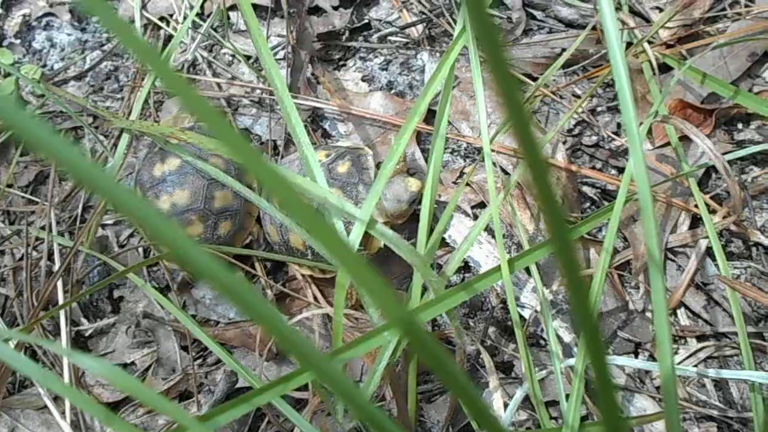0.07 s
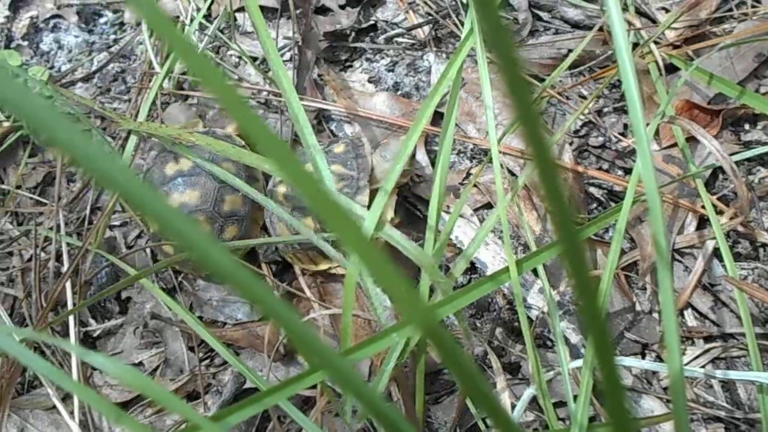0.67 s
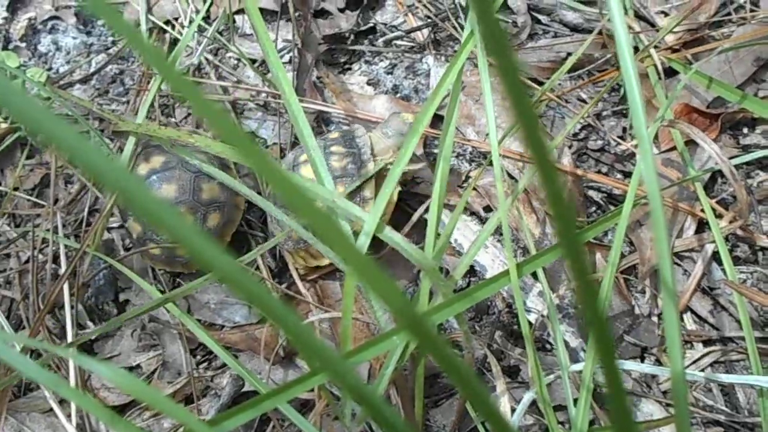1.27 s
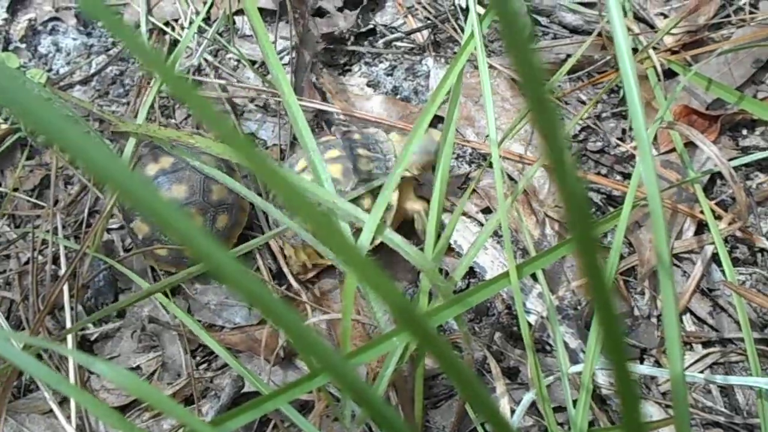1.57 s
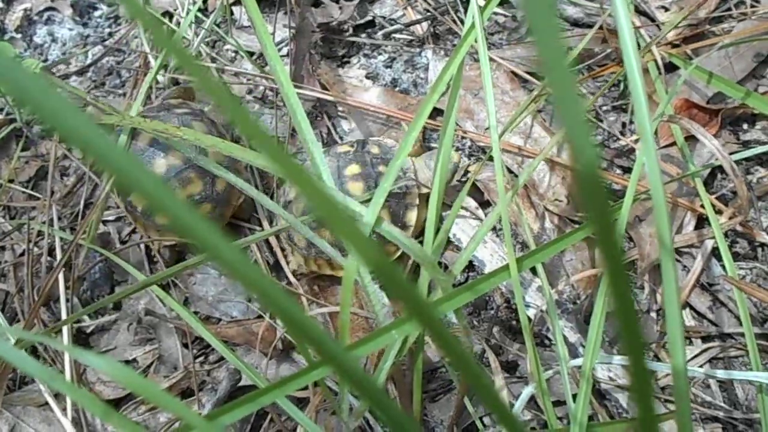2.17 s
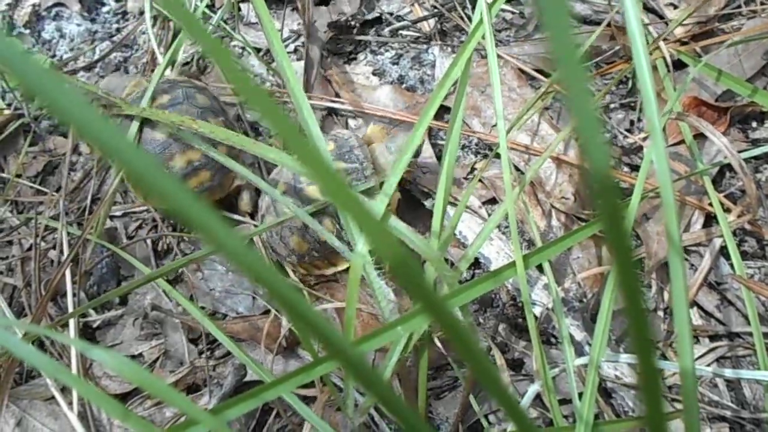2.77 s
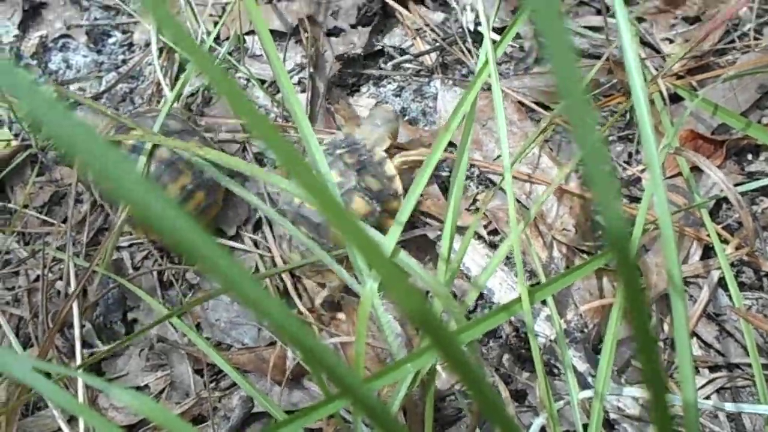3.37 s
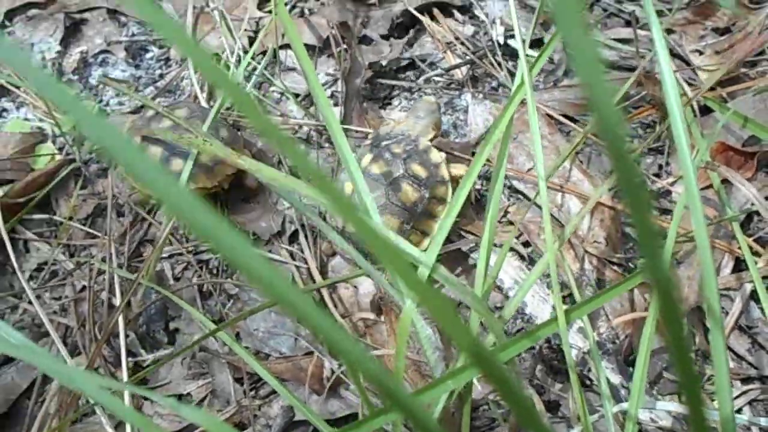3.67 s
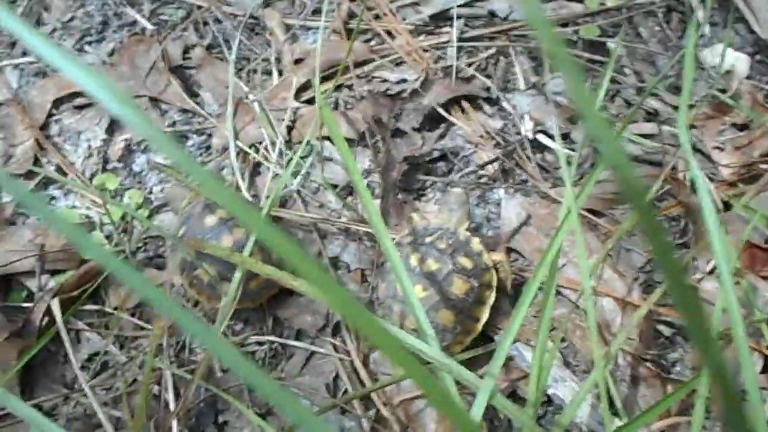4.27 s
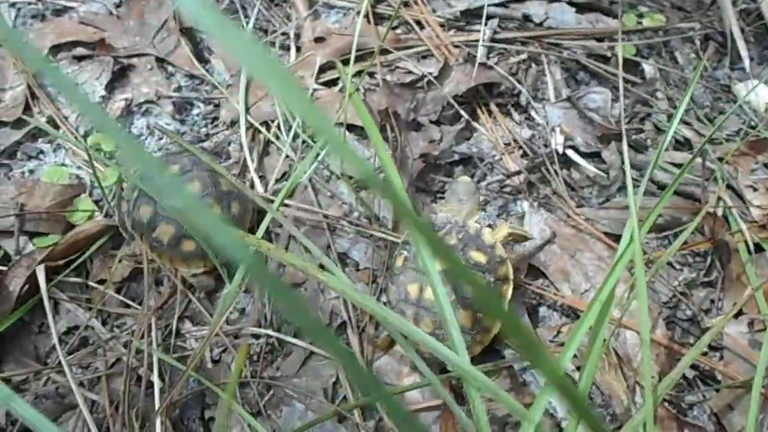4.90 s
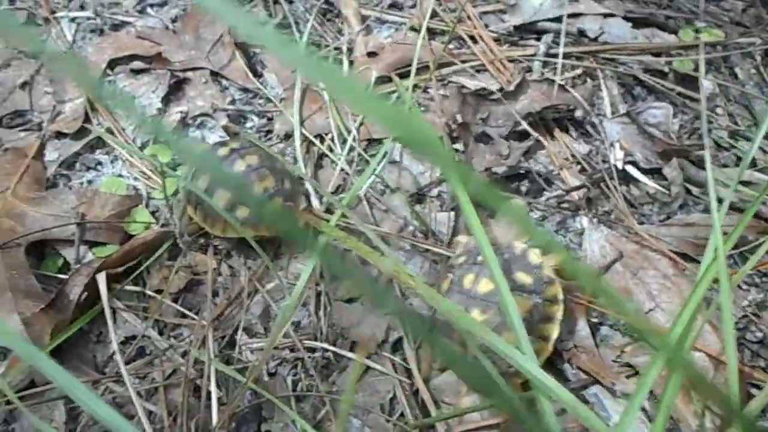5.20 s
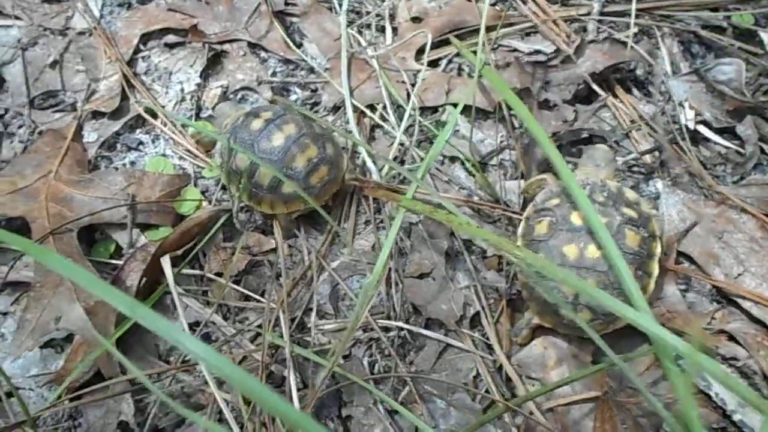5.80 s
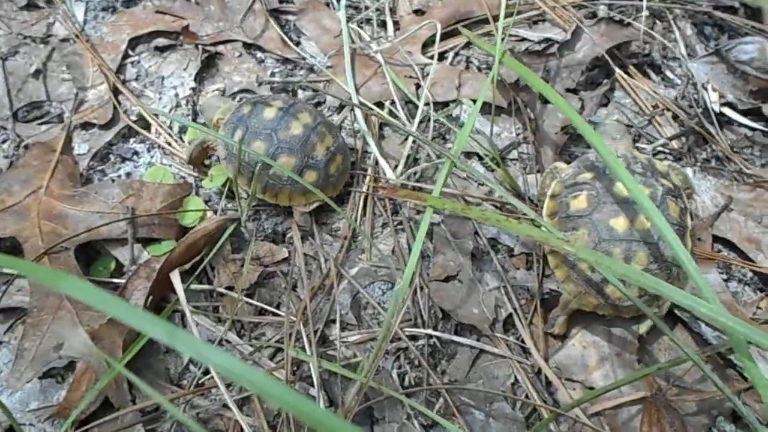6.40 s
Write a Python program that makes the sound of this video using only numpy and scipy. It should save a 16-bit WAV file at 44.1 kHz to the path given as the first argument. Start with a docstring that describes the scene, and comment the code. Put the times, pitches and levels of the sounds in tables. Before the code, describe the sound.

The sound fades in over the first half second on open air: a low wind rumble, a far engine-like drone and a faint hiss, all of which stay throughout. Close to the microphone, two small tortoises push through dry leaf litter and grass. Light rustles and crisp snaps come from about 0.3 to 0.7 seconds, followed by a lull with a few ticks. Around 1.5 to 1.9 seconds there are more crackles, a small knock and faint shell scrapes. The busiest stretch runs from 2.4 to 4 seconds, with uneven rustling and the sharpest snaps and dull twig knocks near 2.5 and 3.3 seconds. Short bursts follow around 4.3 to 4.7 and 5 to 5.4 seconds. Near 6 seconds come more crackles, soft scrapes and little knocks, with a last knock at 6.4 seconds as the rustling settles.

```python
"""Two small tortoises push through dry leaf litter and long grass, close to the microphone.
Each push of a foot or shell breaks tiny fibres that ring the leaves: they rustle, crackle and snap.
A shell scrapes over the litter, and there are a few dull knocks among the twigs.
Behind them, in the open air, lie a low rumble, a far engine-like drone and a faint hiss.
The microphone fades in at the start."""
import sys
import numpy as np
from scipy import signal
from scipy.fft import rfft, irfft
from scipy.io import wavfile
from scipy.ndimage import uniform_filter1d

SR = 44100
rng = np.random.default_rng(int(sys.argv[2]) if len(sys.argv) > 2 else 0)


def master(y):
    """Save y as 16-bit WAV."""
    cut = np.clip(np.atleast_2d(y).T, -1, 1)
    pcm = np.round(cut * 32767)  # scale
    wavfile.write(sys.argv[1], SR, pcm.astype(np.int16))


N = 293265

# spectrum of the open air: f/Hz, relative level/dB
AIR_SPECTRUM = [(20, 2), (35, 0.5), (60, 0), (100, -0.5), (150, -7.5), (220, -7.5), (300, -12), (400, -19),
                (510, -16), (900, -19.5), (1400, -28.5), (2400, -34.5), (4000, -35), (10500, -42.5)]
# bands of the far drone: f/Hz, width/Hz, level before the swell/dB
DRONE_BANDS = [(80.1, 9, -43.5), (88.1, 6.8, -49), (113, 6.7, -47.5), (134.1, 6.4, -51.5),
               (158.2, 4.9, -53), (185, 6.3, -53)]
# the drone swells and sinks: t/s, gain/dB
DRONE_SWELL = [(0.07, 9), (1.1, 2.5), (2.2, -1.5), (3.2, 1), (4.3, -3.5), (5.3, -2.5), (6.0, 0),
               (6.65, -1.5)]
# knocks and ticks, like shell or claw on a twig: t/s, f/Hz, time to fall 60 dB/s, strength/dB
KNOCKS = [(0.7358, 3980, .018, -32), (1.2386, 3520, 0.045, -42), (1.5582, 1520, .012, -34.5),
          (1.5566, 3480, 0.018, -35), (2.51, 1980, 0.0072, -29.5), (3.3157, 940, 0.012, -30),
          (3.3173, 1220, .012, -35.5), (3.333, 1750, 0.015, -25.5), (4.7116, 2380, 0.0091, -31.5),
          (4.713, 1540, 0.01, -32), (6.004, 1227, .012, -35), (6.005, 1570, 0.02, -33.5),
          (6.117, 1480, 0.011, -34), (6.155, 1550, 0.014, -39.5), (6.432, 1350, 0.015, -33),
          (6.437, 1880, 0.036, -32.5)]
# a shell drags over the litter: middle t/s, half length/s, f/Hz, level at the middle/dB
SCRAPES = [(1.76, 0.016, 1404, -53), (1.847, 0.022, 2080, -50.5), (4.367, 0.016, 1890, -49.5),
           (5.101, .012, 3226, -55), (5.181, .008, 3120, -50), (5.932, 0.018, 2870, -58),
           (6.04, 0.008, 2920, -46.5), (6.175, 0.054, 3000, -58.5)]
# a foot or shell pushes into the litter: t/s, length/s, effort/dB
PUSHES = [(0.326, 0.078, -60), (0.487, 0.11, -55), (0.625, 0.044, -54), (1.532, 0.031, -47.5),
          (1.658, 0.042, -47.5), (1.747, 0.041, -52), (1.964, .03, -65), (2.2, 0.018, -55.5),
          (2.428, 0.12, -46), (2.499, 0.038, -42), (2.558, 0.14, -55.5), (2.798, .04, -53.5),
          (2.984, 0.031, -47), (3.05, 0.14, -49), (3.227, 0.073, -50), (3.338, .075, -53),
          (3.448, 0.12, -54.5), (3.617, 0.17, -49.5), (3.8, 0.25, -55), (3.999, 0.026, -45),
          (4.296, 0.032, -49.5), (4.356, 0.019, -46.5), (4.514, 0.029, -46.5), (4.569, 0.059, -47),
          (4.709, 0.044, -54), (4.969, 0.16, -59.5), (5.052, 0.13, -49), (5.309, 0.13, -54),
          (5.692, 0.035, -58), (5.883, 0.064, -50.5), (5.996, .055, -47.5), (6.167, 0.037, -47.5)]
# small movements between the pushes: t/s, effort/dB
SHUFFLE = [(.1, -54.5), (1.4, -67.5), (2.3, -60), (3.5, -57), (4.2, -61), (5.5, -61.5), (6.2, -62),
           (6.6, -66.5)]
# resonances of a middling dry leaf: lower edge f/Hz, peak f/Hz, upper edge f/Hz, peak width/Hz
LEAF_MODES = [(1270, 1900, 2770, 740), (2930, 3740, 4600, 630), (5340, 6370, 9200, 340),
              (9430, 9560, 15000, 2100)]
# colour of the small crackles in such a leaf: f/Hz, gain/dB
CRACKLE_COLOUR = [(1400, -3.5), (1950, -3.5), (2700, -4), (3250, 4), (3720, 6), (4200, 4), (5000, -2.5),
                  (5800, 4.5), (6600, 5.5), (7700, 3), (9100, 6.5), (10500, 5.5)]
# the leaves underfoot change along the way, larger ones ringing lower: t/s, pitch factor
LEAF_PITCH = [(0.3, 0.97), (1.2, 1.17), (2.0, 0.94), (2.5, 1.01), (3.1, 1.04), (3.35, 0.96), (3.8, 1.09),
              (4.05, 0.97), (4.35, 0.9), (5.1, 0.89), (5.4, 0.82), (5.9, 0.83), (6.6, 0.88)]
# leaves and stalks snap: t/s, crack length/s, strength over 5 ms/dB, favoured f/Hz
SNAPS = [(.3419, 0.00046, -35, 10000), (.3515, 0.0011, -43, 9000), (.3927, .001, -46, 8900),
         (.514, .0004, -42, 8040), (.622, 0.0011, -41.5, 6000), (.7359, 0.00046, -38, 4700),
         (0.9847, 0.0013, -47.5, 4200), (1.54, 0.00037, -46, 3870), (1.5508, .0016, -36, 3840),
         (1.5582, 0.00099, -35.5, 2460), (1.9641, .002, -43.5, 5400), (1.987, .0004, -43.5, 4800),
         (2.1128, 0.0014, -44, 3500), (2.2724, 0.0058, -47, 4200), (2.3797, 0.0014, -42.5, 5140),
         (2.4614, 0.00054, -35.5, 5760), (2.5, .0007, -39, 9800), (2.5109, 0.00016, -25.5, 6050),
         (2.5298, 0.00043, -43, 6400), (2.54, .0014, -42, 6600), (2.5464, 0.0014, -41.5, 5400),
         (2.7558, .0007, -41, 7600), (2.8082, 0.00048, -39.5, 9200), (2.82, .0004, -42.5, 7800),
         (2.8993, 0.00082, -43.5, 7100), (3.0074, 0.0013, -39, 5800), (3.053, 0.0013, -40, 6600),
         (3.062, 0.00033, -37, 8200), (3.067, 0.0019, -34.5, 8000), (3.237, 0.0014, -42.5, 4700),
         (3.2832, 0.0016, -39.5, 6600), (3.2919, 0.0011, -35.5, 4600), (3.3325, 0.00047, -26.5, 5860),
         (3.3377, .0013, -36.5, 6200), (3.3893, 0.0015, -29.5, 4460), (3.6376, 0.0012, -37.5, 7000),
         (3.761, .0018, -37, 9650), (3.892, 0.00068, -34, 8400), (4.0093, 0.00091, -39.5, 4010),
         (4.018, 0.0013, -41, 3390), (4.2147, 0.0021, -44, 4300), (4.53, 0.0024, -38, 9630),
         (4.5928, 0.00064, -42, 5200), (4.615, 0.0016, -37, 7800), (4.618, 0.00082, -32.5, 5760),
         (4.762, 0.0023, -46, 4230), (5.1163, 0.00041, -40, 3940), (5.3666, 0.0013, -42, 5200),
         (5.6934, 0.00036, -44, 5000), (5.8256, 0.0016, -42, 10000), (5.8705, 0.00086, -41.5, 3500),
         (6.0107, 0.0011, -41, 3330), (6.1041, 0.0015, -37, 8000)]
# the microphone fades in: t/s, gain/dB
FADE_IN = [(0, -96), (.0715, -94), (.073, -15.5), (.16, -17.5), (.25, -9), (.4, -4.5), (.55, -1.5),
           (1.5, 0.5), (6.65, 1)]

CRISP_DB_PER_OCTAVE = 5   # smaller, higher leaves are also crisper


def from_db(db):
    return 10 ** (np.asarray(db) / 20)


def unit_rms(x):
    return x / np.sqrt(np.mean(x ** 2) + 1e-20)


def in_time(rows):
    """A table of time and value, read at every sample."""
    return np.interp(np.arange(N) / SR, *np.transpose(rows))


def at_hz(points, hz):
    """A spectrum read on a log-frequency axis."""
    freqs, levels = np.transpose(points)
    return np.interp(np.log(hz), np.log(freqs), levels)


def butter(x, hz, kind, order=2):
    return signal.sosfilt(signal.butter(order, hz, kind, fs=SR, output="sos"), x)


def resonance(x, hz, width_hz):
    """Two-pole resonance with gain 1 at its peak."""
    r = np.exp(-np.pi * width_hz / SR)
    feedback = [1, -2 * r * np.cos(2 * np.pi * hz / SR), r * r]
    return signal.lfilter(np.array([1, 0, -1]) * (1 - r * r) / 2, feedback, x + 1e-18)


def drift(rate_hz):
    """A smooth random wander with rms 1."""
    r = np.exp(-2 * np.pi * rate_hz / SR)
    return unit_rms(signal.lfilter([1], [1, -2 * r, r * r], rng.standard_normal(N + SR))[SR:])


def open_air(level_db=-38, swell_db=0.5):
    """All around: low wind and far-off rumble under a faint hiss."""
    hz = np.maximum(np.arange(N // 2 + 1) * SR / N, 1)
    air = irfft(rfft(rng.standard_normal(N)) * from_db(at_hz(AIR_SPECTRUM, hz)), N)
    return from_db(level_db + swell_db * drift(rate_hz=3)) * unit_rms(butter(air, 17.8, "high"))


def far_drone():
    """In the distance: an engine-like drone of narrow, wavering bands of noise."""
    drone = np.zeros(N)
    for hz, width, db in DRONE_BANDS:
        band = resonance(rng.standard_normal(N + SR), hz, 2 * width)
        drone += from_db(db) * unit_rms(resonance(band, hz, 2 * width)[SR:])
    return from_db(in_time(DRONE_SWELL)) * drone


def twig_knocks(scuff_db=-5, scuff_s=0.0047):
    """On the ground nearby: a soft, scuffing contact sets a twig ringing briefly."""
    size = 4096
    t, out = np.arange(size) / SR, np.zeros(N + size)
    for start, hz, t60, db in KNOCKS:
        ring = np.sin(2 * np.pi * hz * t) * from_db(-60 * t / t60)
        scuff = unit_rms(resonance(rng.standard_normal(size), hz, hz / 2)) * np.exp(-t / scuff_s)
        at = round(start * SR)
        out[at:at + size] += from_db(db) * butter(ring + from_db(scuff_db) * scuff, 1.1 * hz, "low")
    return out[:N]


def shell_scrapes(slips_per_s=700, spread_db=5, ring_q=4.6, overtone=1.96, overtone_db=-5.5):
    """A shell sticks and slips unevenly; each slip rings a broad leaf resonance and its overtone."""
    t, out = np.arange(N) / SR, np.zeros(N)
    for middle, half_length, hz, db in SCRAPES:
        slipping = rng.random(N) < slips_per_s / SR
        slips = slipping * from_db(spread_db * rng.standard_normal(N)) * rng.choice([-1, 1], N)
        ring = resonance(slips, hz, hz / ring_q)
        ring -= from_db(overtone_db) * resonance(slips, overtone * hz, hz / ring_q)
        swell = np.exp(-0.5 * ((t - middle) / half_length) ** 2)
        out += from_db(db) * unit_rms(butter(ring, [hz / 2, hz * 2.3], "band")) * swell
    return out


def tortoise_effort(attack_s=0.0065, settle_s=0.017, swing_db=2.5):
    """How hard the litter is pressed, in dB: pushes rise, hold and settle over a slight shuffling."""
    t = np.arange(N) / SR
    power = from_db(in_time(SHUFFLE) + swing_db * drift(rate_hz=5.3)) ** 2
    for start, length, db in PUSHES:
        rise = np.clip((t - start) / attack_s, 0, 1)
        fall = np.exp(-np.clip((t - start - length) / settle_s, 0, 20))
        power += (from_db(db) * rise * fall) ** 2
    return 10 * np.log10(power)


def fibre_ticks(push_db, usual_per_s=36, usual_db=-58, colour_db=5):
    """Single brittle fibres break and stand out from the rustle, more often under a push."""
    per_s = usual_per_s * from_db(0.46 * (push_db - usual_db))
    at = np.flatnonzero(rng.random(N) < per_s / SR)
    tick_db = np.minimum(push_db[at] + 21, -35)   # louder with the push, up to a limit
    tick_db += CRISP_DB_PER_OCTAVE * np.log2(in_time(LEAF_PITCH)[at])
    colours = from_db(colour_db * rng.standard_normal((len(at), len(LEAF_MODES) - 1)))
    colours /= np.sqrt(np.mean(colours ** 2, axis=1, keepdims=True))   # each favours its own resonance
    out = np.zeros(N)
    for k, (low, peak, high, width) in enumerate(LEAF_MODES[1:]):
        clicks = np.zeros(N)
        clicks[at] = (-1) ** k * from_db(tick_db) * colours[:, k]
        band = butter(clicks, [low, high], "band")
        out += 2 * (band + 2 * resonance(band, peak, width))
    return out


def leaf_rustle(push_db, usual_per_s=2400, usual_db=-55, clump_db=4, ring_q=16, reach_octaves=0.4):
    """Close up: tiny fractures come in clumps, more under a harder push, and ring the nearby leaves."""
    pitch = in_time(LEAF_PITCH)
    per_s = usual_per_s * from_db(push_db - usual_db)
    size_db = 2.8 * np.minimum(rng.exponential(1, N), 3.5) + clump_db * drift(rate_hz=70)
    clicks = (rng.random(N) < per_s / SR) * from_db(size_db) * rng.choice([-1, 1], N)
    # even out the power, so that the push sets the level
    clicks /= np.sqrt(np.maximum(uniform_filter1d(clicks ** 2, size=1500), 1e-4))
    at = np.flatnonzero(clicks)
    leaf_hz = np.exp(rng.uniform(np.log(1400), np.log(13000), N)[at])
    bending, edges = np.zeros(N), np.zeros(N)
    for k, hz in enumerate(np.geomspace(1400, 11800, num=36)):
        # each fracture rings around the pitch of its own leaf
        chance = 0.6 * np.exp(-0.5 * (np.log2(hz / leaf_hz) / reach_octaves) ** 2)
        colour = from_db(at_hz(CRACKLE_COLOUR, hz / pitch[at]))
        struck = np.zeros(N)
        struck[at] = clicks[at] * (rng.random(N)[at] < chance) * colour
        ring = (-1) ** k * resonance(struck, hz, hz / ring_q) / np.sqrt(hz)
        if hz < 5000:
            bending += ring
        else:
            edges += ring
    bending = unit_rms(butter(bending, [1100, 6000], "band"))
    edges = unit_rms(butter(edges, [4400, 13000], "band"))
    # crisp edges gain on the bending leaves as the push grows
    crisp_db = 0.073 * (push_db + 53) + CRISP_DB_PER_OCTAVE * np.log2(pitch)
    return from_db(push_db - 5) * bending + from_db(push_db + crisp_db - 3.5) * edges


def leaf_snaps(build_db=-14, build_s=0.00044, scatter_db=-30, scatter_s=0.0019, detune=0.068):
    """Close up: fibres give way, a crack runs on in tiny fractures, the leaf rings amid the litter."""
    size, lead = 2048, 64
    t, out = (np.arange(size) - lead) / SR, np.zeros(N + size)
    pitch = in_time(LEAF_PITCH)
    for start, crack_s, db, favoured_hz in SNAPS:
        at = round(start * SR) - lead
        breaking = rng.random(size) < 0.29
        fibres, litter = rng.standard_normal((2, size))
        build_up = from_db(build_db) * fibres * np.exp(-abs(t) / build_s)
        fractures = 0.33 * fibres * breaking * np.exp(-abs(t) / (2 * crack_s))
        scattered = from_db(scatter_db) * litter * np.exp(-abs(t) / scatter_s)
        force = np.where(t < 0, build_up, fractures + scattered)
        force[lead] = 1   # the break itself
        sign = rng.choice([-1, 1])
        focus_db_per_octave = 8 * np.sqrt(0.00098 / crack_s)   # longer tears spread wider in pitch
        for low, peak, high, width in LEAF_MODES:
            ring_hz = peak * pitch[at] * np.exp(detune * rng.standard_normal())   # no two leaves alike
            band = butter(force, [low * pitch[at], high * pitch[at]], "band")
            ring = band + 1.95 * resonance(band, ring_hz, width)
            ring *= np.sqrt(0.005 * SR / np.sum(ring ** 2))   # the energy of 5 ms at rms 1
            ring_db = db - 1.2 - focus_db_per_octave * abs(np.log2(peak / favoured_hz))
            out[at:at + size] += sign * from_db(ring_db) * ring
            sign = -sign
    return out[:N]


def scene():
    """Tortoises in dry litter close to the microphone, the open air behind them; mono."""
    push_db = tortoise_effort()
    leaves = leaf_snaps() + leaf_rustle(push_db) + fibre_ticks(push_db)
    return (leaves + shell_scrapes() + twig_knocks() + open_air() + far_drone())[None, :]


def record(dry, bass_hz=186, edge_hz=10020, shelf_db=-22, cutoff_hz=12200):
    """The microphone fades in, bass first; its top treble drops steeply and is cut above that."""
    fade_db = in_time(FADE_IN)
    bass = butter(dry, bass_hz, "low", order=1)
    faded = bass * from_db(0.9 * fade_db) + (dry - bass) * from_db(fade_db)
    passed = butter(faded, edge_hz, "low", order=16)
    top = from_db(shelf_db) * butter(faded, edge_hz, "high", order=16)
    return signal.sosfilt(signal.ellip(10, 0.3, 80, cutoff_hz, fs=SR, output="sos"), passed + top)


dry = scene()
out = record(dry)
master(out)
```